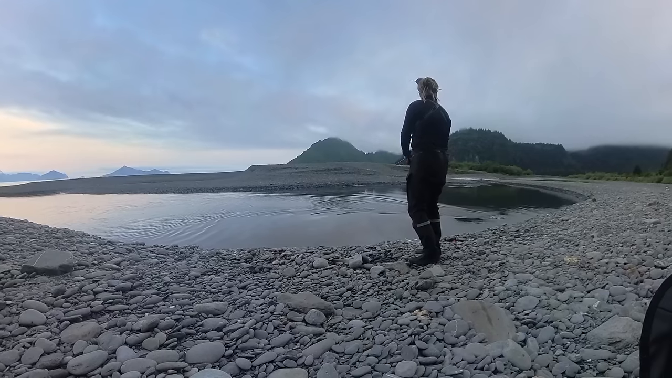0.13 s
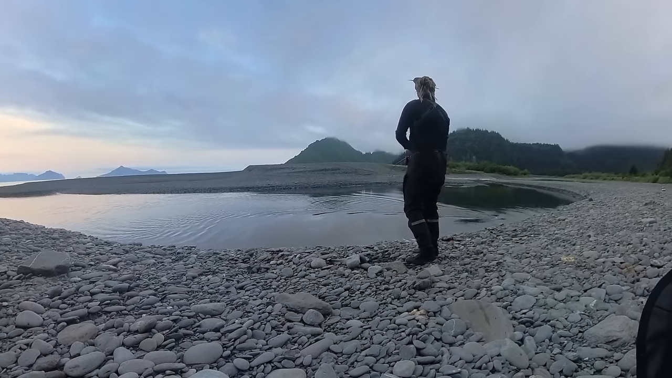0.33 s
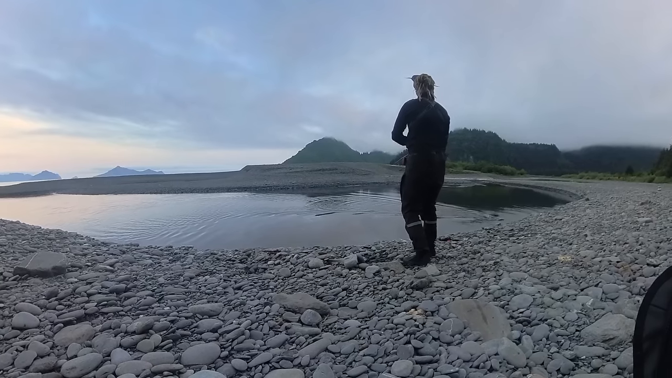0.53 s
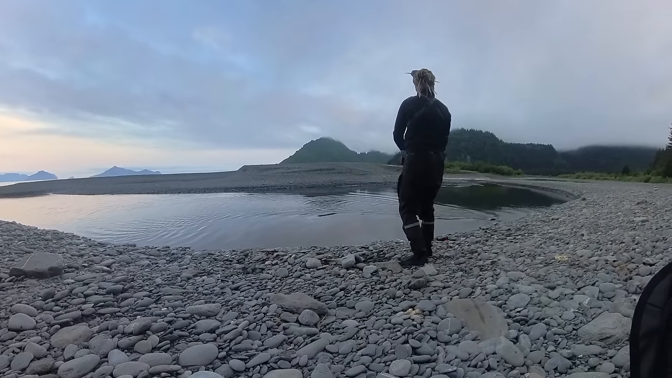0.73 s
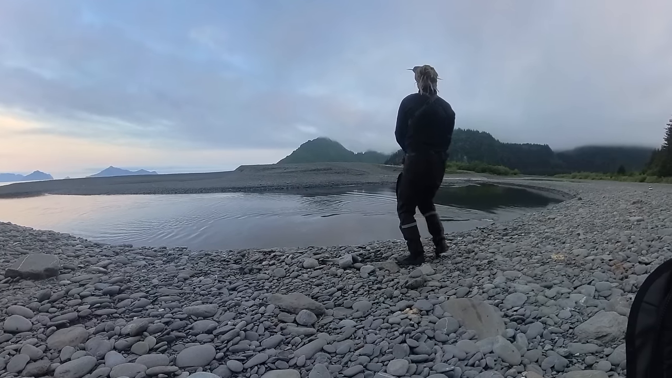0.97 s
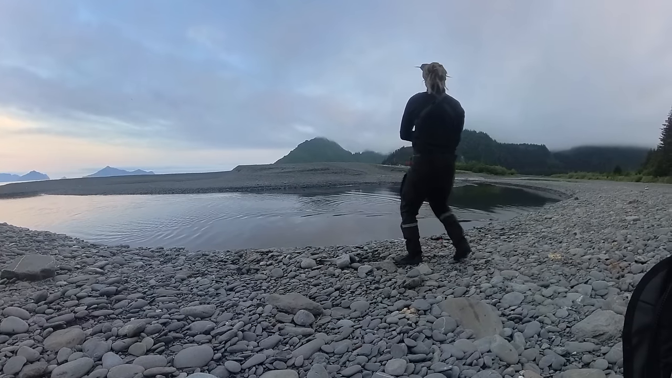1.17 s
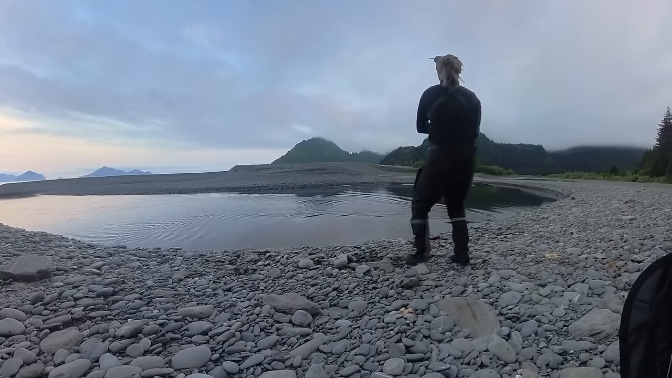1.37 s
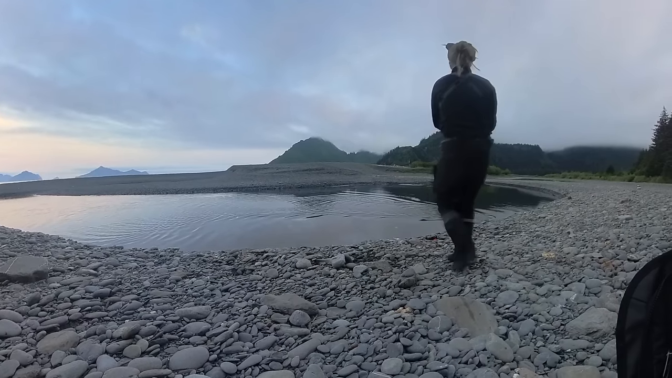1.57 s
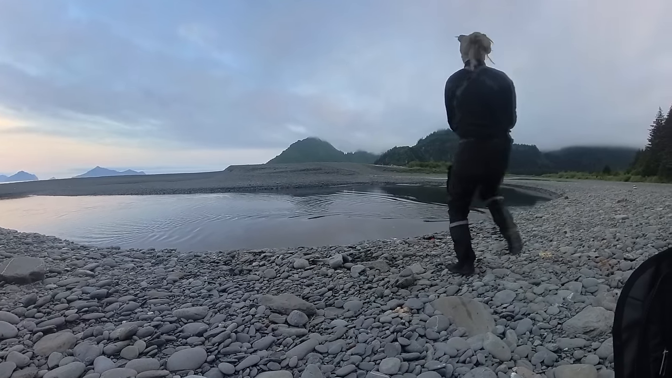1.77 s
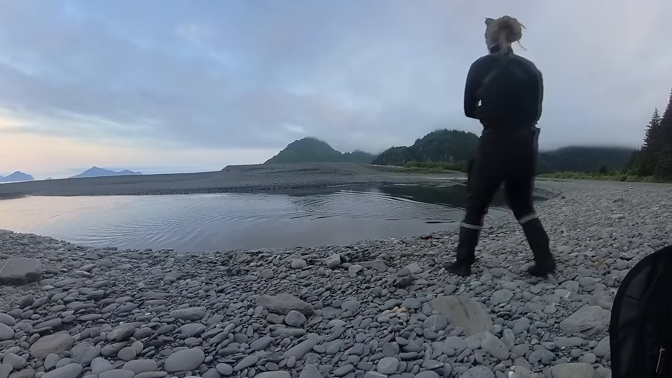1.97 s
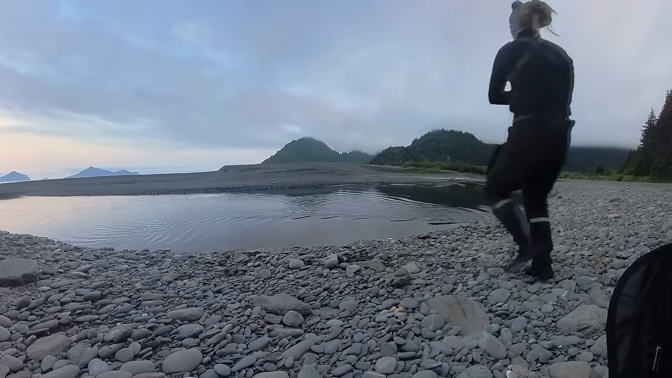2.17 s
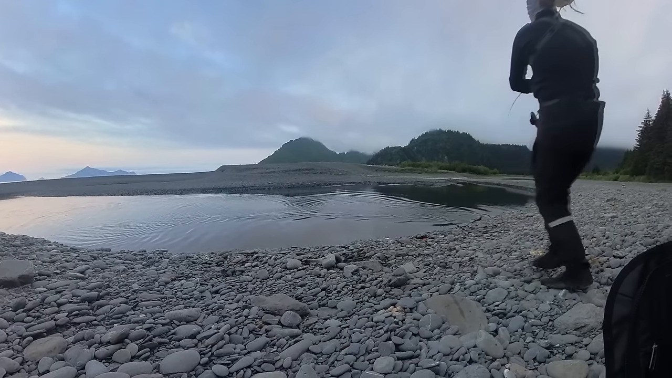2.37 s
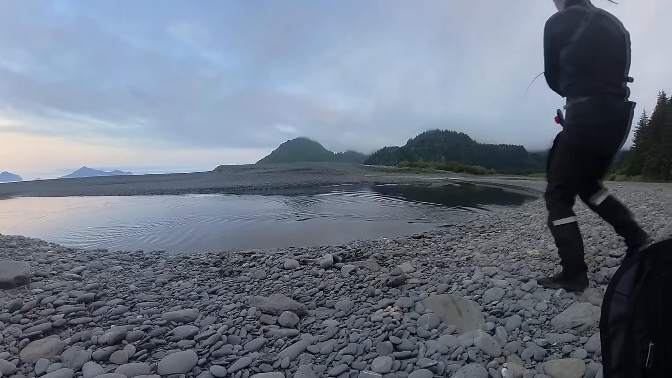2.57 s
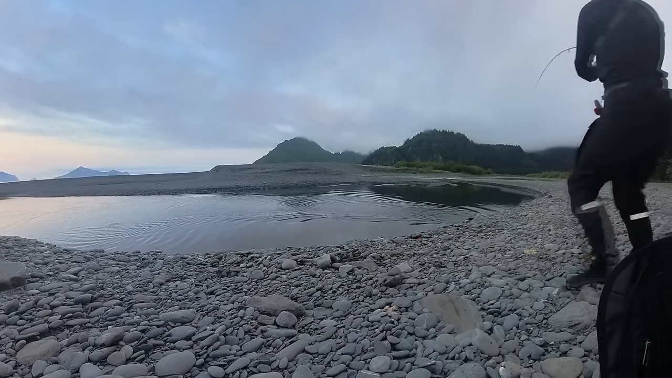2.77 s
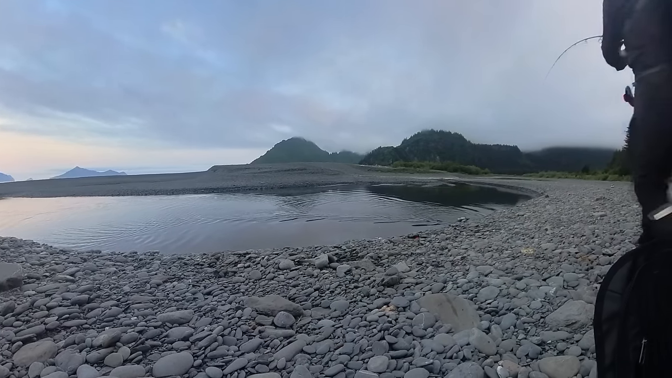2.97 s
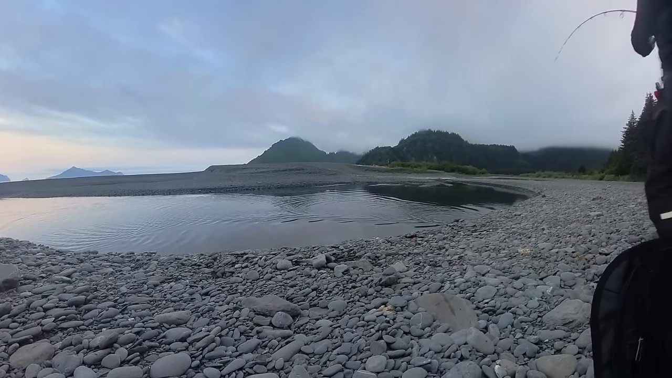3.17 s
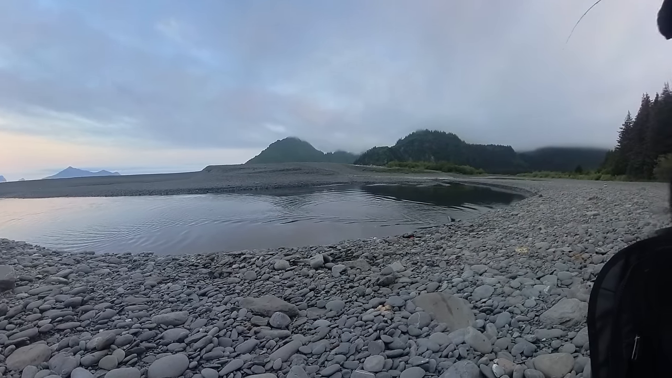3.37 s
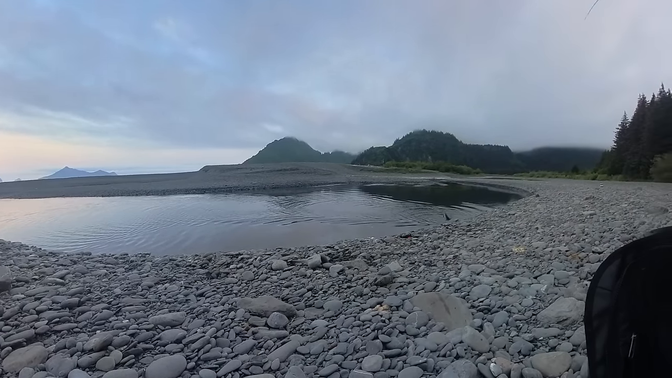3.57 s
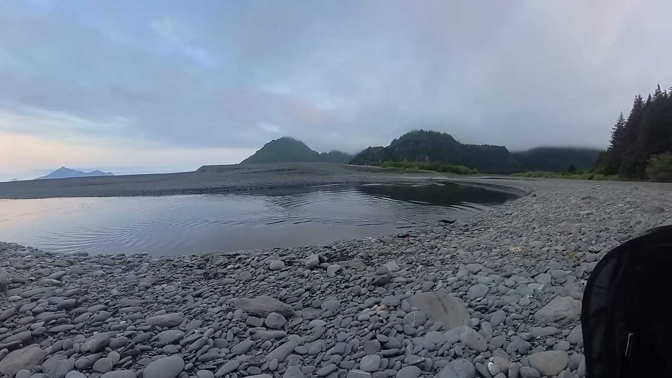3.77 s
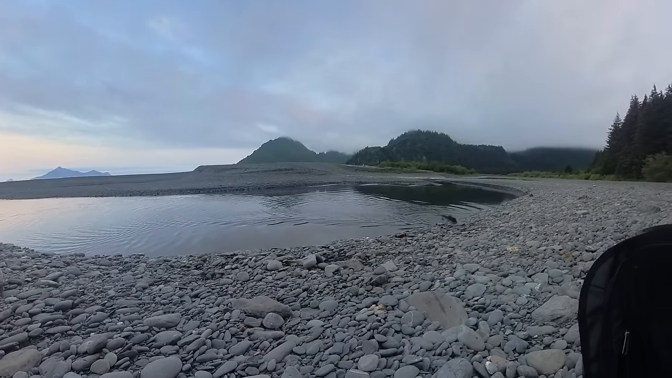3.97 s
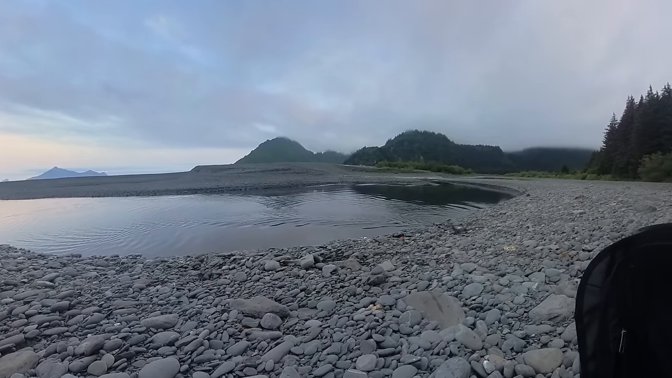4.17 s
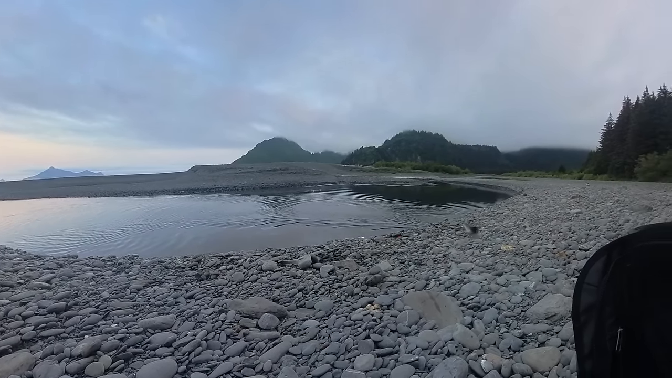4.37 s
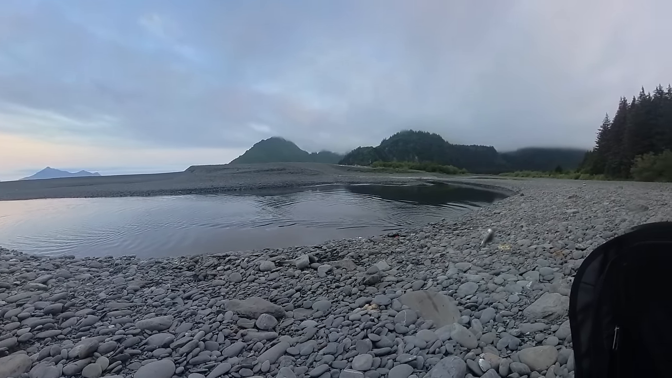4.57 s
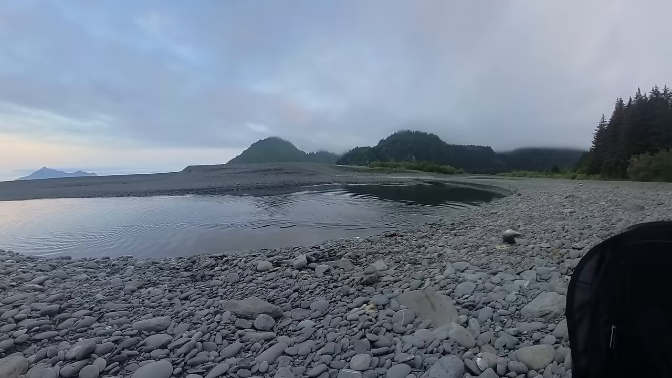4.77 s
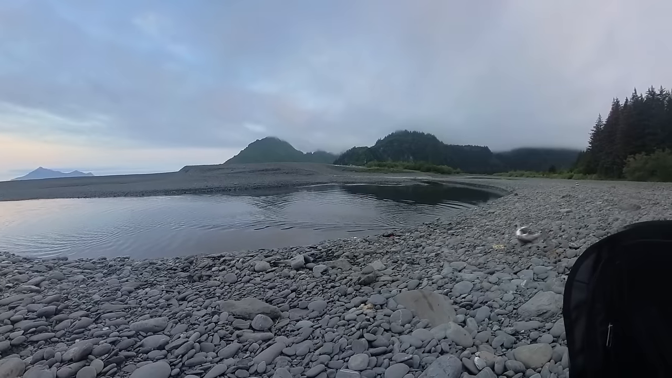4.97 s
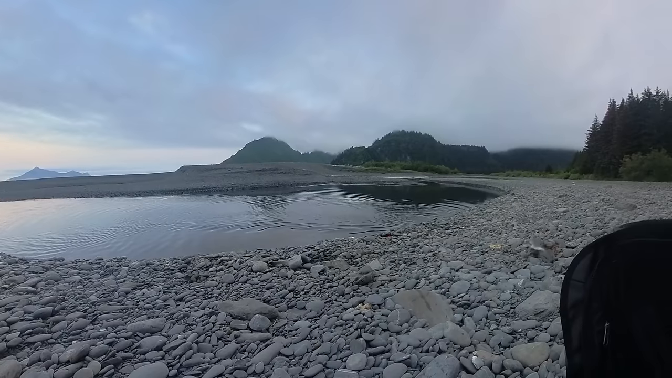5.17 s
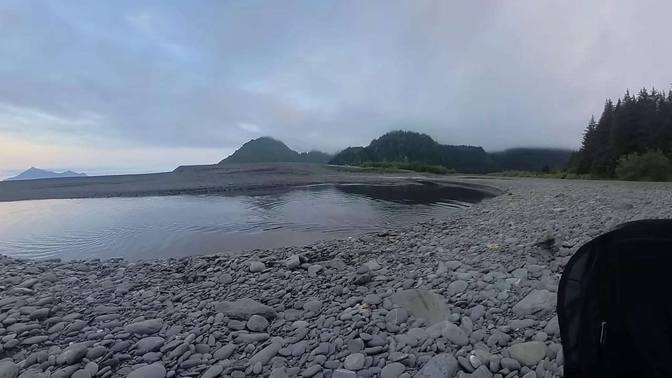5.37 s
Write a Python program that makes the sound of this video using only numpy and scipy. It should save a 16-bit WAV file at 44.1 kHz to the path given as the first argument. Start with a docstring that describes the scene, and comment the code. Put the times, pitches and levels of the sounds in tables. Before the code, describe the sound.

An open pebble shore beside calm water, heard dry and close by a low microphone. From 0 to 1.3 seconds it is quiet: faint rippling wash, little bubbly plips, and soft, dull shifts of boots on stones. At about 1.3 a stone knocks, and from 1.5 to 1.75 a quick run of clear clacks leads into a short, bright crunch. Around 2.2 to 2.5 sharp clicks rattle densely with hollow knocks as the steps come nearer. From 3.1 to 3.3 a heavy step lands, the strongest moment, with deep woody knocks and low thuds. Steady crunching continues from 3.4 to 4.2, full of gritty crackle, clinking pebbles and a hard, bright clack near 3.76. From 4.3 to 5.4 the footwork gets lighter: irregular clacks, brief thin stone pings near 4.77 and 5.28, and pebbles trickling back into place. A very faint low rumble grows underneath.

```python
"""Boots on beach stones

A person in wading boots shifts about, then walks close by across flat, rounded stones; calm water laps faintly.
Boots crunch small pebbles (clouds of short resonant clicks) and load a hollow bed (low resonances, soft thuds).
Larger stones knock (soft resonances), clack (sharp swings plus scatter) and ring (decaying sines).
The shore is patchy noise with short bubble sines; a faint low rumble grows underneath."""
import sys
import numpy as np
from scipy import signal
from scipy.fft import rfft, irfft, next_fast_len
from scipy.io import wavfile
from scipy.ndimage import uniform_filter1d

SR = 44100
rng = np.random.default_rng(int(sys.argv[2]) if len(sys.argv) > 2 else 0)


def digitize_waveform(pressure):
    """Quantize a signal to 16-bit integers and store it at the path in sys.argv[1].

    Rows of a 2-D input are taken as channels; values are limited to [-1, 1].
    """
    field = np.atleast_2d(pressure).T
    bounded = np.clip(field, -1, 1)
    quanta = np.round(bounded * 32767).astype(np.int16)
    wavfile.write(sys.argv[1], SR, quanta)


N = 238404

# boot loads or scuffs the pebbles: full_load_s, hold_ms, grit_db, bed_db, fine_to_coarse_db
BOOT_LOADS = [(0.054, 140, -57, -48.5, -4), (0.368, 34, -59, -51, 8), (0.464, 22, -68, -40, 0),
              (0.636, 35, -51, -35, -16), (0.685, 63, -48.5, -32.5, -8), (0.794, 10.4, -44, -35, -3),
              (0.88, 7.9, -55, -47, -15), (0.955, 44, -48.5, -38, -1.5), (1.117, 24, -50, -46, 1),
              (1.343, 65, -41.5, -40, 2), (1.471, 88, -43.5, -39.5, -3), (1.734, 7, -21, -21.5, 1),
              (1.905, 16, -36, -32.5, -3), (2.029, 70, -36.5, -32, -7), (2.174, 7.3, -35, -33, -7),
              (2.211, 22.5, -29.5, -26, 23), (2.455, 56, -33.5, -29.5, -2.5), (2.771, 67, -34.5, -32, 0),
              (2.873, 55, -28.5, -35, -5.5), (3.095, 17.6, -24, -23.5, -3.5), (3.159, 25, -29, -27, -2),
              (3.232, 35, -24.5, -21, -6), (3.335, 12, -33.5, -56, -1), (3.417, 16, -36, -31.5, -5),
              (3.595, 11.4, -32.5, -25, -4), (3.782, 7.8, -29.5, -26.5, 3), (3.843, 24, -31, -25, 3),
              (3.953, 18, -26, -24.5, -5.5), (4.052, 31, -36, -28.5, -5), (4.131, 36, -30.5, -29.5, 5),
              (4.306, 31, -27, -34.5, 7), (4.383, 5.9, -34.5, -37, 2), (4.453, 14, -48, -36, -8),
              (4.602, 42, -27, -29, -5), (4.681, 63, -38.5, -36.5, -2), (4.758, 100, -38, -50, 10),
              (4.91, 57, -36, -40.5, 11), (5.007, 53, -39, -39.5, 1), (5.138, 17, -56, -42.5, 14),
              (5.291, 17, -44, -33, -20), (5.357, 12, -36, -42.5, 0.5)]
# stone strikes stone: start_s, level_db (rms over 5 ms, before a common trim), contact_pitch_hz,
# scattered_share (limited to 0-1)
STONE_STRIKES = [(0.51, -43.5, 9500, 0.08), (1.34, -27, 2420, 0.76), (1.514, -30, 4330, 0.4),
                 (1.53, -23.5, 1780, 0.2), (1.536, -27, 5340, 0), (1.543, -22.5, 4860, 0),
                 (1.5994, -21.5, 4770, 0.08), (1.646, -27.5, 4320, 0.04), (1.6752, -37.5, 5160, .1),
                 (1.6903, -35.5, 4630, 0.2), (1.8572, -29, 9300, 0.9), (1.9763, -30, 7800, 0.2),
                 (2.0932, -21.5, 6930, 0.83), (2.219, -18.5, 9000, 0.3), (2.2294, -17, 8800, 0.2),
                 (2.256, -21.5, 9900, 0), (2.271, -16, 3280, 0.3), (2.2841, -16, 2200, 0.16),
                 (2.298, -21.5, 7800, 0.8), (2.318, -35, 9600, 0.03), (2.337, -36, 10000, 0.2),
                 (2.344, -35, 10000, 0.2), (2.3838, -34, 8300, 0.3), (2.407, -33.5, 8100, .15),
                 (2.4325, -16.5, 4780, 0.67), (2.4514, -19, 5820, 1.03), (2.4623, -21, 8500, 0.2),
                 (2.4779, -17, 6800, 0.4), (2.545, -26.5, 7500, 0.05), (2.561, -27.5, 8450, 0.3),
                 (2.596, -29, 3040, 0.7), (2.698, -32, 4800, 0.1), (2.708, -28.5, 4480, 0.04),
                 (2.824, -20.5, 6300, 0.55), (2.878, -22, 4300, 0.1), (2.887, -22.5, 5300, 0.05),
                 (2.9744, -25, 2840, 0.36), (3.0405, -32, 2830, 0.5), (3.066, -38, 4230, 0),
                 (3.081, -23, 4080, 0.3), (3.099, -15.5, 4070, 0.36), (3.162, -18.5, 5050, 0.54),
                 (3.235, -15, 3000, 0.35), (3.2368, -22.5, 1720, 0.2), (3.3242, -27.5, 2300, 0.2),
                 (3.344, -30, 4800, 0.5), (3.3485, -26.5, 5200, 0), (3.4085, -28, 7000, 0.4),
                 (3.424, -18.5, 4500, 1.16), (3.526, -29.5, 7700, 0.9), (3.5522, -30, 3000, 0.4),
                 (3.565, -21.5, 4930, 1), (3.5809, -16, 2600, 0.98), (3.612, -19, 2640, 0.6),
                 (3.6267, -21.5, 2420, 0.25), (3.649, -22.5, 3780, 0.04), (3.671, -18, 7140, 0.3),
                 (3.689, -22.5, 4770, 0.8), (3.7119, -29, 7500, 0.2), (3.758, -12, 4840, 0.45),
                 (3.7778, -16, 6600, 0.9), (3.842, -24, 3470, 0.9), (3.8733, -24, 9600, 0.4),
                 (3.9304, -32, 10000, 0.2), (3.9395, -19.5, 2330, 0.6), (3.9605, -20, 2230, 0.75),
                 (3.9696, -26, 3180, .4), (4.1168, -19.5, 5170, 1), (4.1484, -19, 6300, 0.6),
                 (4.3636, -19.5, 6550, 0.3), (4.398, -21.5, 3950, 0.74), (4.4314, -20.5, 7040, 0.7),
                 (4.4466, -27.5, 2700, 0.4), (4.4553, -30.5, 3500, 0.4), (4.472, -25, 8200, 0.4),
                 (4.5015, -21.5, 5420, 0.24), (4.539, -27.5, 4800, 0.8), (4.563, -30.5, 3820, 0.4),
                 (4.5893, -22, 5960, 0.5), (4.765, -18, 8400, 0.84), (4.781, -33, 3200, 0.4),
                 (4.794, -29, 3500, 0.4), (4.8239, -25.5, 4100, 0.3), (4.883, -25.5, 2740, 0),
                 (4.899, -24, 6100, 0.6), (4.9028, -16.5, 4430, 0.35), (4.9106, -17, 7300, 0.1),
                 (4.9403, -26.5, 7500, 0.4), (4.949, -23.5, 3280, 0.54), (5.028, -32, 6600, 0),
                 (5.0483, -25.5, 6500, 0.2), (5.054, -21.5, 2330, 0.8), (5.1314, -29.5, 6540, 0.2),
                 (5.1408, -25.5, 7800, 0.26), (5.1824, -30, 4760, 0.3), (5.202, -36, 6500, 0),
                 (5.277, -19.5, 2710, 0.68), (5.2985, -19.5, 6070, 0.63), (5.3485, -23, 8600, 0.26)]


def from_db(db):
    """Decibels to amplitude gain."""
    return 10 ** (np.asarray(db) / 20)


def rms_one(x):
    """Scale to an rms of 1."""
    return x / np.sqrt(np.mean(x ** 2) + 1e-20)


def add(out, start_s, sound):
    """Mix a short sound in at start_s."""
    i = int(np.clip(round(start_s * SR), 0, N - 1))
    out[i:i + len(sound)] += sound[:N - i]


def butter(x, hz, kind, order=2):
    """Causal Butterworth low-, high- or band-pass."""
    sos = signal.butter(order, np.clip(hz, 10, .45 * SR), kind, fs=SR, output="sos")
    return signal.sosfilt(sos, x)


def resonate(x, hz, q):
    """Two-pole resonance with unit gain at its peak."""
    hz = min(hz, .4 * SR)
    b, a = signal.iirpeak(hz, max(q, 3 * hz / SR), fs=SR)
    return signal.lfilter(b, a, x + 1e-18)  # offset avoids denormals


def coloured(x, spectrum):
    """Impose a long-term spectrum but keep the grain; rms 1."""
    hz, db = np.transpose(spectrum)
    bins = rfft(x)
    bin_hz = np.maximum(np.fft.rfftfreq(N, 1 / SR), 1)
    own = np.sqrt(uniform_filter1d(np.abs(bins) ** 2, size=401) + 1e-9)
    target_db = np.interp(np.log(bin_hz), np.log(hz), db, left=-70)
    return rms_one(irfft(bins / own * from_db(target_db), N))


def patchy(x, depth_db, per_s, span_hz, count=14):
    """Each band swells and fades by itself, as pebbles or ripples take turns; rms 1."""
    size = next_fast_len(N, True)
    bins = rfft(x, size)
    place = np.interp(np.fft.rfftfreq(size, 1 / SR), span_hz, [0, 1]) ** .7 * (count - 1)
    swells = rng.standard_normal((count, 1000))
    at = np.arange(N) / SR * per_s
    out = np.zeros(N)
    for k, swell in enumerate(swells):
        band = irfft(bins * np.maximum(1 - np.abs(place - k), 0), size)[:N]
        out += band * from_db(depth_db * np.interp(at, np.arange(len(swell)), swell))
    return rms_one(out)


def grains(per_s, spread_db, low_hz, high_hz, q, count=20):
    """Random contacts of uneven strength, each ringing at one of count stone pitches; rms 1."""
    sizes = from_db(spread_db * np.minimum(rng.exponential(1, N), 4)) * rng.choice([-1, 1], N)
    clicks = sizes * (rng.random(N) < per_s / SR)
    dealt = rng.integers(0, count, N)
    out = np.zeros(N)
    for k, hz in enumerate(np.geomspace(low_hz, high_hz, count)):
        out += resonate(clicks * (dealt == k), hz, q) / np.sqrt(hz)
    return rms_one(out)


def rumble():
    """Low band of noise whose level grows steadily in dB."""
    start_db, growth_db_per_s = -78, 5.5
    level_db = start_db + growth_db_per_s * np.arange(N) / SR
    return from_db(level_db) * rms_one(butter(rng.standard_normal(N), [65, 220], "band"))


def shore(count=30, size=2200):
    """Ripples wash as patchy noise; small bubbles ring as decaying sines in bursts of three."""
    # relative spectrum of the wash: freq_hz, density_db_per_hz
    wash_spectrum = [(25, -14), (80, -10), (160, -2), (280, 2), (500, 0), (1200, -1), (2100, -13),
                     (3000, -22.5), (11000, -47), (15000, -34)]
    # bubble bursts at the water's edge: start_s, centre_pitch_hz, peak_db
    bursts = [(0.028, 1900, -43), (0.056, 2160, -43), (0.232, 1020, -40), (0.25, 1600, -41),
              (0.39, 1300, -40), (0.415, 1130, -40), (0.893, 1030, -36)]
    wash_db = -49.5
    bubble_t60_s, attack_s = 0.023, 0.00092
    burst_s, burst_octaves = 0.022, 0.24  # longest delay; pitch spread either way
    wash = patchy(rng.standard_normal(N), depth_db=3.5, per_s=24, span_hz=[150, 2500])
    out = from_db(wash_db) * coloured(wash, wash_spectrum)
    t = np.arange(size) / SR
    # fainter bursts within the first 1.3 s, crowded towards the start
    faint = [(1.3 * when ** 2, 700 * 3 ** pitch, -42 - 6 * pitch - 12 * weakness)
             for when, pitch, weakness in rng.random((count, 3))]
    plip = np.minimum(t / attack_s, 1) * from_db(-60 * t / bubble_t60_s)
    for start_s, hz, db in bursts + faint:
        for late, small in rng.random(size=(3, 2)):
            bubble_hz = hz * 2 ** (burst_octaves * (2 * small - 1))
            bubble = from_db(db) * plip * np.sin(2 * np.pi * bubble_hz * t)
            add(out, start_s + burst_s * late, bubble)
    return out


def thuds(swell_ms=5.5, size=4500):
    """The hollow bed gives under the boot: a low sine swells, then dies within a few cycles."""
    # weight lands on the bed: start_s, pitch_hz, peak_envelope_db
    landings = [(1.33, 214, -33.5), (1.734, 195, -35), (2.071, 194, -32), (2.445, 230, -30),
                (3.103, 195, -25.5), (3.166, 185, -23), (3.222, 202, -20), (3.257, 186, -16),
                (3.373, 179, -30.5), (3.425, 163, -30.5), (3.776, 180, -26.5), (3.866, 169, -27),
                (3.962, 171, -27), (4.128, 156, -22.5), (4.638, 210, -29.5), (4.998, 197, -33),
                (5.279, 172, -34)]
    out, t = np.zeros(N), np.arange(size) / SR
    age = 1000 * t / swell_ms
    for start_s, hz, db in landings:
        add(out, start_s, from_db(db) * age * np.exp(1 - age) * np.sin(2 * np.pi * hz * t))
    return out


def knocks(rattle_t60_s=0.014, rattle_gain=0.075, soft_ratio=2.4, trim_db=-4.0, size=3600):
    """A big stone rocks and seats itself: soft contact and brief rattle drive its resonance."""
    # rocking stones: start_s, level_db (rms over 10 ms, before trim_db), pitch_hz, resonance_q
    rocking = [(0.364, -32, 258, 6.1), (0.697, -27, 333, 11), (0.738, -24, 296, 3.2), (0.805, -33, 700, 3),
               (1.105, -30.5, 427, 9), (1.328, -25.5, 467, 5.7), (1.339, -31.5, 1300, 2.6),
               (1.5293, -24, 950, 1.9), (1.567, -31, 620, 8), (1.722, -26.5, 597, 3),
               (1.809, -29, 389, 6.4), (1.916, -25.5, 505, 4.2), (2.073, -24, 430, 5),
               (2.282, -24, 590, 0.91), (2.433, -25, 480, 4), (2.452, -18.5, 382, 5.3),
               (2.476, -19, 352, 6.3), (2.533, -28.5, 400, 9), (2.766, -24.5, 414, 9.6),
               (2.912, -26.5, 517, 4.5), (3.072, -24, 440, 9), (3.161, -18, 523, 3.7),
               (3.215, -22.5, 474, 6.4), (3.228, -11.5, 328, 7), (3.236, -10, 496, 2.1),
               (3.248, -21.5, 740, 5.2), (3.26, -20, 323, 4.6), (3.296, -25, 600, 8.2),
               (3.37, -20, 810, 8.5), (3.372, -17, 450, 3.9), (3.409, -22, 410, 4.7),
               (3.549, -25.5, 450, 2.8), (3.579, -16.5, 490, 12), (3.608, -17, 546, 12),
               (3.682, -28.5, 395, 16), (3.76, -24.5, 413, 8.4), (3.852, -19, 564, 5.6),
               (3.871, -21, 450, 6.1), (3.902, -24, 620, 4.6), (3.941, -17, 540, 1.7), (3.959, -16, 660, 8),
               (4.117, -19, 529, 9.9), (4.307, -27, 436, 7), (4.324, -25.5, 450, 9.5), (4.377, -26, 477, 7),
               (4.387, -23, 400, 5.3), (4.445, -34, 431, 6.4), (4.661, -26.5, 390, 8),
               (4.994, -33, 420, 6.7), (5.011, -25, 385, 6.8), (5.055, -29.5, 410, 6),
               (5.276, -27.5, 570, 1.7), (5.299, -27, 900, 2.3)]
    out, t = np.zeros(N), np.arange(size) / SR
    noises = rng.standard_normal((len(rocking), size))
    for (start_s, db, hz, q), noise in zip(rocking, noises):
        push = 1. * (t == 0) + rattle_gain * noise * from_db(-60 * t / rattle_t60_s)
        band_hz = [110, max(soft_ratio * hz, 200)]
        knock = rms_one(butter(resonate(push, hz, q), band_hz, "band", order=3))
        add(out, start_s, from_db(db + trim_db) * knock * np.sqrt(.01 * SR / size))
    return out


def pings(count=5):
    """Flat stones set ringing at random while the sole presses; rows: start_s, hz, peak_db, t60_s."""
    ping_to_grit_db, t60_s, low_hz, high_hz = -1, 0.035, 3000, 11020
    chances = rng.random((len(BOOT_LOADS), count, 2))
    rows = []
    for (start_s, hold_ms, grit_db, *_), stones in zip(BOOT_LOADS, chances):
        for when, small in stones:
            hz = low_hz * (high_hz / low_hz) ** small
            rows.append((start_s + when * hold_ms / 1000, hz, grit_db + ping_to_grit_db, t60_s))
    return rows


def rings(size=6000):
    """Bending modes of thin, loosely lying stones: exponentially decaying sines."""
    # thin stones that ring on: start_s, pitch_hz, peak_db, t60_s
    thin_stones = [(3.467, 8160, -37, 0.17), (3.467, 10700, -34, 0.079), (3.526, 8570, -21.5, 0.03),
                   (3.527, 11000, -40, .05), (3.373, 3760, -15, 0.017), (3.757, 10430, -13, 0.019),
                   (4.765, 10500, -12.5, 0.02), (5.038, 7750, -23, 0.023), (5.278, 2080, -13, 0.0096),
                   (5.278, 4160, -25, 0.011), (5.278, 6460, -18, 0.03), (5.349, 11200, -21, 0.033)]
    out, t = np.zeros(N), np.arange(size) / SR
    for start_s, hz, db, t60_s in thin_stones + pings():
        add(out, start_s, from_db(db - 60 * t / t60_s) * np.sin(2 * np.pi * hz * t))
    return out


def grazes():
    """Light, fully scattered touch just before each listed strike; rows as in STONE_STRIKES."""
    longest_lead_s, graze_to_clack_db = 0.013, -20.5
    leads = rng.uniform(0.49, 1, len(STONE_STRIKES))
    return [(start_s - longest_lead_s * lead, db + graze_to_clack_db, hz, 1)
            for (start_s, db, hz, _), lead in zip(STONE_STRIKES, leads)]


def tipped_stones(count=2):
    """Each crunch tips stones that clack afterwards; the later, the softer and cleaner."""
    latest_s, tip_to_grit_db, latest_loss_db = 0.14, 3.5, 18
    low_hz, high_hz = 2540, 9850
    chances = rng.random((len(BOOT_LOADS), count, 2))
    rows = []  # as in STONE_STRIKES
    for (start_s, _, grit_db, *_), stones in zip(BOOT_LOADS, chances):
        for late, small in stones:
            db = grit_db + tip_to_grit_db - latest_loss_db * late
            hz = low_hz * (high_hz / low_hz) ** small
            rows.append((start_s + latest_s * late, db, hz, 1 - late))
    return rows


def clacks(scatter_t60_s=0.026, q=0.98, tail_db=-18, tail_t60_s=0.11, mode_db=-6, mode_t60_s=0.016,
           trim_db=-1.16, size=2200, count=3):
    """Sharp contact swing with two bounces, dull stone recoil, brief modes and scattered reflections."""
    body_to_clack_db, body_hz = -17, 1090
    out, t = np.zeros(N), np.arange(size) / SR
    around = from_db(-60 * t / scatter_t60_s) + from_db(tail_db - 60 * t / tail_t60_s)
    around *= t > .0004  # reflections arrive after the contact
    strikes = STONE_STRIKES + grazes() + tipped_stones()
    noises = rng.standard_normal((len(strikes), size))
    ratios = 2 ** rng.uniform(-0.76, 0.598, (len(strikes), count))
    bounces_s = rng.uniform([.00015, .0006], [.0006, .0014], (len(strikes), 2))
    for (start_s, db, hz, share), noise, ratio, bounce_s in zip(strikes, noises, ratios, bounces_s):
        share = np.clip(share, 0, 1)
        contact = 1. * (t == 0)
        add(contact, bounce_s[0], [.65])
        add(contact, bounce_s[1], [-.4])
        direct = rms_one(resonate(resonate(contact, hz, q), hz, q))
        mode_sines = np.sin(2 * np.pi * hz * ratio[:, None] * t).sum(0)
        modes = rms_one(mode_sines * from_db(-60 * t / mode_t60_s))
        reflections = rms_one(resonate(noise * around, hz, 0.37))
        scattered = rms_one(reflections + from_db(mode_db) * modes)
        body = rms_one(butter(resonate(contact, body_hz, 2.1), 2 * body_hz, "low"))
        clack = np.sqrt(1 - share) * direct + np.sqrt(share) * scattered
        clack += from_db(body_to_clack_db) * body
        add(out, start_s, from_db(db + trim_db) * clack * np.sqrt(.005 * SR / size))
    return out


def footwork():
    """Coarse, fine and bed strength over time: creep plus touch, swell, hold, release and settling."""
    # pebbles creeping between steps: time_s, grit_db, bed_db
    creep = [(0, -62.5, -48.5), (.3, -70, -48), (.57, -66, -49), (.9, -59, -44.5), (1.3, -70, -49.5),
             (1.55, -63, -46.5), (1.95, -47, -40), (2.36, -56.5, -54), (2.65, -47.5, -45.5),
             (3.02, -48.5, -41), (3.3, -46, -45), (3.5, -44, -43), (3.7, -47, -42), (4.0, -49, -40),
             (4.25, -44, -40), (4.5, -47, -45.5), (4.85, -48, -48), (5.15, -48, -52), (5.4, -54, -48)]
    creep_fine_to_coarse_db = 6
    rise_ms, release_ms = 20, 67  # times per 20 dB, also touch_ms and settle_ms
    touch_db, touch_ms = -25, 30  # sole brushes the stones before full load
    settle_db, settle_ms = -8.5, 200
    bed_stir_db = -2.5  # heavy stones stir less than grit before and after a step
    t = np.arange(0, N, 16) / SR

    def powers(grit_db, bed_db, bright_db):
        """Split grit power between coarse and fine pebbles; append bed power."""
        fine_share = 1 / (1 + from_db(-bright_db) ** 2)
        grit = from_db(grit_db) ** 2
        return np.array([grit * (1 - fine_share), grit * fine_share, from_db(bed_db) ** 2])

    time_s, grit_db, bed_db = np.transpose(creep)
    power = powers(np.interp(t, time_s, grit_db), np.interp(t, time_s, bed_db), creep_fine_to_coarse_db)
    for start_s, hold_ms, *levels in BOOT_LOADS:
        ms = 1000 * (t - start_s)
        before_ms, after_ms = np.maximum(-ms, 0), np.maximum(ms - hold_ms, 0)
        press_db = -20 * (before_ms / rise_ms + after_ms / release_ms)
        stir_db = np.where(ms < 0, touch_db, settle_db)
        stir_db = stir_db - 20 * (before_ms / touch_ms + after_ms / settle_ms)
        shape_db = np.maximum(press_db, [stir_db, stir_db, stir_db + bed_stir_db])
        power = power + powers(*levels)[:, None] * from_db(shape_db) ** 2
    return [np.interp(np.arange(N) / SR, t, np.sqrt(p)) for p in power]


def crunch():
    """Small pebbles crackle and chink under the sole while the larger ones below grumble."""
    # relative spectra of pebbles and stone bed: freq_hz, density_db_per_hz
    grit_spectrum = [(700, -1.5), (1100, -0.5), (1600, -6.5), (2100, -3), (3200, -5.5), (4150, -2.5),
                     (5200, -10), (9000, -12), (11700, -8), (13000, -19), (15000, -17.5)]
    bed_spectrum = [(25, -32), (60, -22), (95, -14), (150, -4.5), (250, 0), (350, 1.5), (480, 1.5),
                    (700, -4), (1050, -11), (1500, -17), (2200, -90), (3500, -36.5)]
    coarse, fine, load = footwork()
    ticks = grains(per_s=2800, spread_db=2.8, low_hz=1080, high_hz=14100, q=2.0)
    chinks = grains(per_s=1500, spread_db=2.2, low_hz=1500, high_hz=12000, q=70, count=70)
    rasp = rng.standard_normal(N)  # sand between the pebbles
    mixed = patchy(ticks + chinks + .45 * rasp, depth_db=3.3, per_s=90, span_hz=[900, 12500])
    grit = coloured(mixed, grit_spectrum)
    split_hz = 5200
    low = rms_one(butter(grit, split_hz, "low", order=3))
    high = rms_one(butter(grit, split_hz, "high", order=3))
    bed_grains = grains(per_s=700, spread_db=1.0, low_hz=132.7, high_hz=1740, q=7, count=28)
    bed = coloured(bed_grains, bed_spectrum)
    # disturbed pebbles drop back one by one; the cap keeps heavier steps from hardening them
    drops = grains(per_s=130, spread_db=1.5, low_hz=1700, high_hz=9500, q=3.5)
    drop_gain = np.minimum(np.hypot(coarse, fine), from_db(-35)) * from_db(-9)
    settling = drop_gain * rms_one(butter(drops, 1300, "high"))
    pebbles = from_db(-0.68) * coarse * low + from_db(2.5) * fine * high
    return pebbles + from_db(0.49) * load * bed + settling


def widen(spread, centred, low_hz=3200, high_hz=10500):
    """The grit's treble is wide between the channels; clacks sit in the centre."""
    sources = np.array([spread, centred, rng.standard_normal(N)])
    grit, clack, diffuse = butter(sources, [low_hz, high_hz], "band", order=6)
    smooth_power = uniform_filter1d(np.array([grit, clack]) ** 2, size=2600)
    grit_power, clack_power = np.abs(smooth_power) + 1e-12
    width = grit_power / (grit_power + 2 * clack_power)
    grit_envelope = np.sqrt(np.abs(uniform_filter1d(grit ** 2, size=120)))
    side = .85 * width * grit_envelope * rms_one(diffuse)
    return spread + centred + side * [[1], [-1]]


def scene():
    """Stones underfoot over the faint lapping of the shore."""
    spread = shore() + crunch()
    centred = rumble() + thuds() + knocks() + rings() + clacks()
    return widen(spread, centred)


def record(dry, roll_off_hz=12200, cutoff_hz=15500):
    """The microphone rolls off the highest treble, the largest peaks clip and the top is cut."""
    heard = np.clip(butter(dry, roll_off_hz, "low", order=7), -1, 1)
    sos = signal.ellip(10, .1, 80, cutoff_hz, fs=SR, output="sos")
    return signal.sosfilt(sos, heard)


dry = scene()
out = record(dry)
digitize_waveform(out)
```